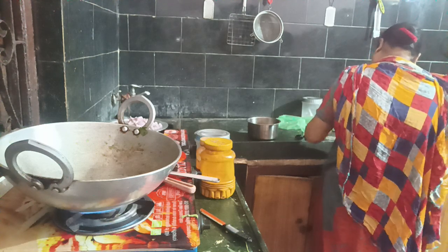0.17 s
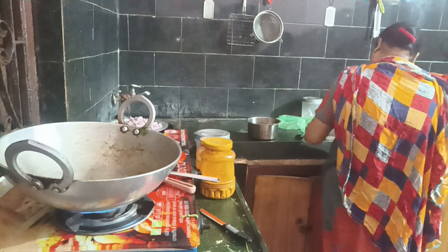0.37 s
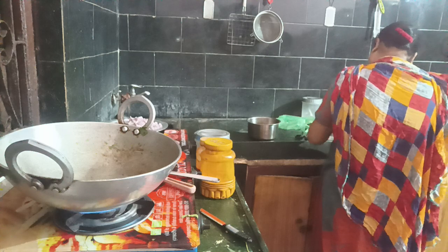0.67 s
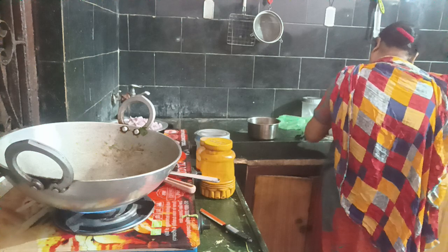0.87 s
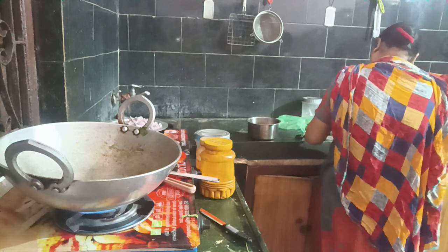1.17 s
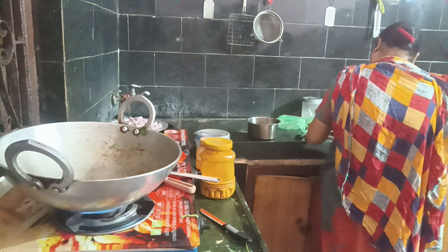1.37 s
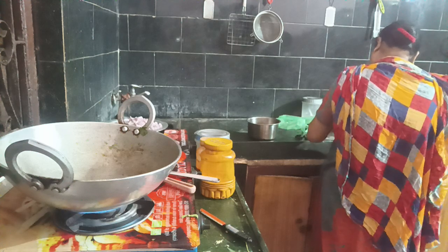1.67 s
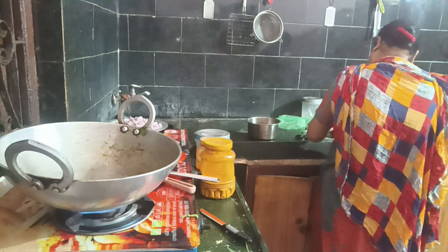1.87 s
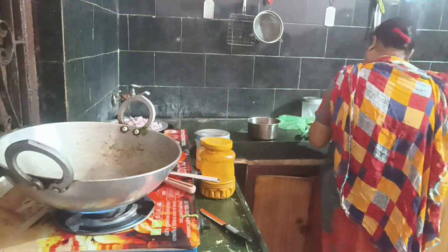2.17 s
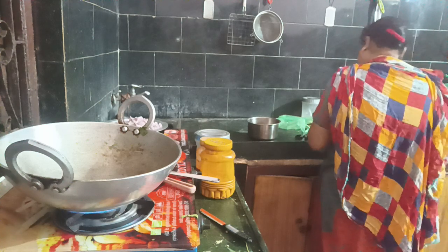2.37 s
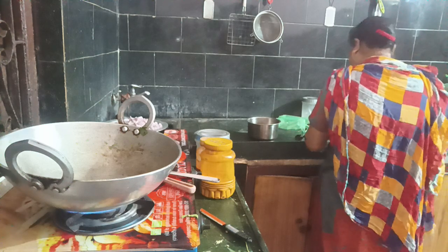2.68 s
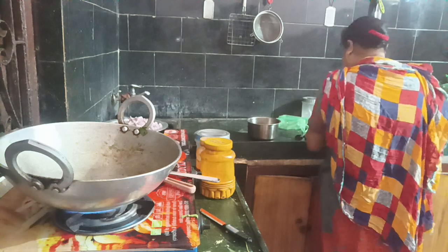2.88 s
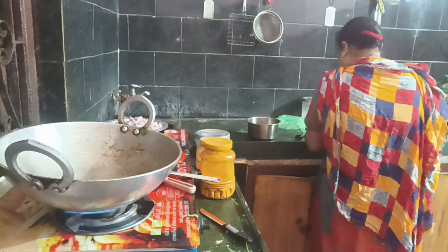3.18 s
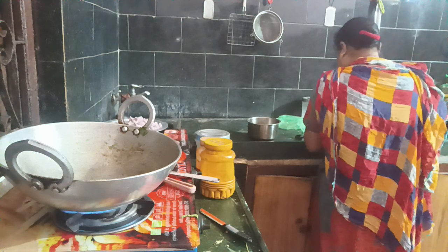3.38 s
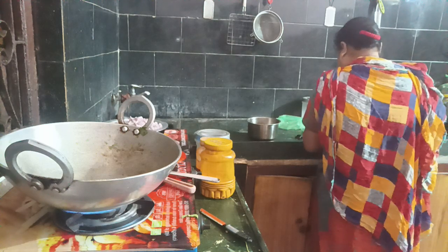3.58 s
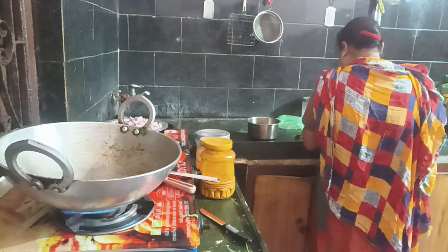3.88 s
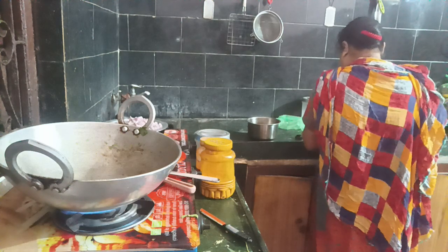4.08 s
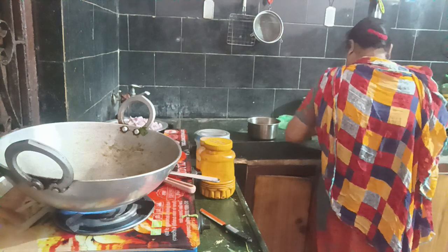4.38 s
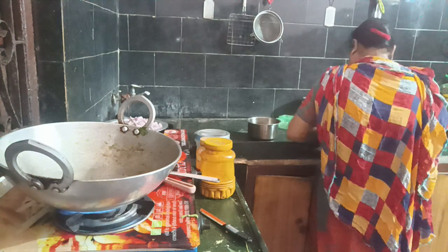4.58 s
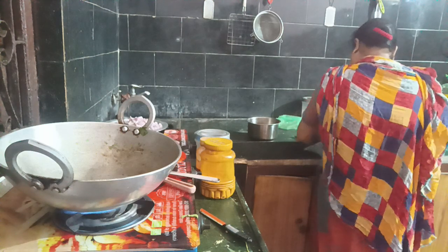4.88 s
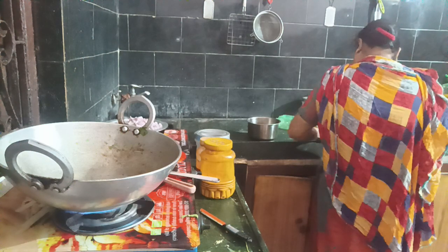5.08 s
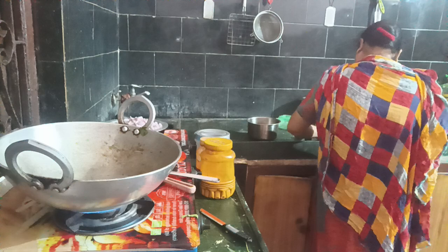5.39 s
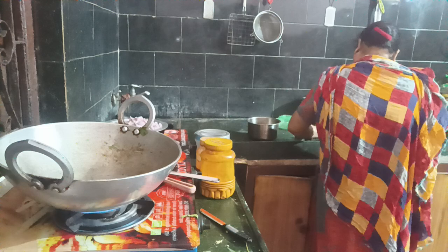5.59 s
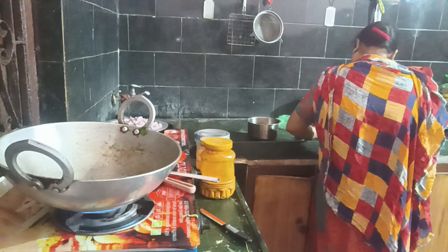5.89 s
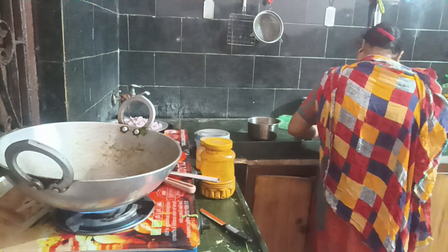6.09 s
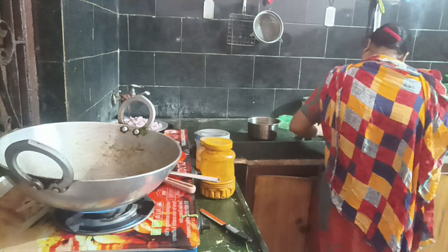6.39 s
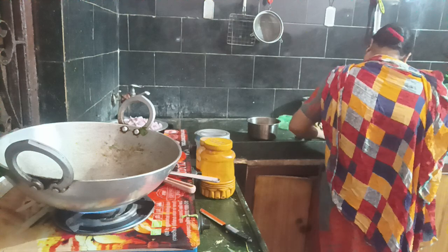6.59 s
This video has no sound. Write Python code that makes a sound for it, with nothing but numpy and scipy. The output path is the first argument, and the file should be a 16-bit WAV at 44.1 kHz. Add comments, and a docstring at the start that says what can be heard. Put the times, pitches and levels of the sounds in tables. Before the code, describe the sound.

Close, bright crackling of hot fat runs throughout, small pops ringing briefly off tiles over a quiet fizz. Behind it, across the room, eight regular dull chopping knocks fall at the beginning and then stop. A faint low thud-like rumble trails them. Around four and a half seconds several weak knocks occur, and near the end a soft hollow tap. Phone microphone, tails clipped by noise reduction.

```python
"""A knife knocks on a board across a small tiled kitchen: filtered clicks feed decaying noise and standing
waves, in a run of even blows and a few soft late ones. Near the microphone a pan sizzles: fat bubbles pop
as short decaying sines that the tiles ring on, over a crowd of small pops and a fizz of shaped noise.
Something low rumbles now and then as beating partials; a noise suppressor in the phone clips the tails
short, band by band, and soft noise fills in."""
import sys
import numpy as np
from scipy import signal
from scipy.fft import rfft, irfft
from scipy.io import wavfile
from scipy.ndimage import uniform_filter1d

SR = 44100
rng = np.random.default_rng(int(sys.argv[2]) if len(sys.argv) > 2 else 0)


def put_to_file(sound):
    """Save the sound as 16-bit audio at rate SR, in the file named by the first command-line argument."""
    columns = np.atleast_2d(sound).T  # one column per channel
    safe = np.clip(columns, -1, 1)
    whole_steps = np.round(safe * 32767)
    wavfile.write(sys.argv[1], SR, whole_steps.astype(np.int16))


N = 296793
LEAD = SR // 4  # samples computed before the start

# spectrum of the frying fat: frequency_hz, density_db (relative, per Hz)
SIZZLE = [(24, -58.5), (40, -40.5), (121, -28), (276, -19.5), (1180, -7.5), (2000, -13.5), (3060, -8),
          (4130, -8), (4700, -7), (5310, 1.5), (5900, -4), (7000, -4.5), (8550, -13), (10400, -20),
          (11300, -93.5), (12100, -29), (16000, -56)]
# noise suppressor: frequency_hz, threshold_db (per band), depth_db (a negative depth lifts)
SUPPRESSOR = [(40, -78, 12.5), (120.9, -74.5, 15.5), (250, -71.5, 19.5), (414, -63.5, 19),
              (980, -66.5, 14.5), (1963, -65.5, 8), (3224, -64.5, 18.5), (4240, -66.5, 10),
              (6270, -65.5, 6), (12000, -67, -2)]


def amp(db):
    """Level law: 20 dB are a factor of ten in amplitude."""
    return 10 ** (np.asarray(db) / 20)


def evened(x):
    """Normalisation to unit rms, the root of the mean power."""
    return x / np.sqrt(np.mean(x ** 2) + 1e-20)


def read(points, hz, column=1):
    """Interpolation of a table column over logarithmic frequency, as pitch is heard."""
    table = np.transpose(points)
    return np.interp(np.log(hz + 1), np.log(table[0] + 1), table[column])


def add(mix, start_s, sound):
    """Superposition: sound pressures add from the given moment on."""
    part = mix[..., LEAD + round(start_s * SR):][..., :sound.shape[-1]]
    part += sound[..., :part.shape[-1]]


def pair_noise(frames, hz):
    """Partial coherence: two random short-time spectra, alike in the bass."""
    # left-right likeness of a diffuse field: frequency_hz, coherence (0 to 1)
    likeness = [(100, 0.69), (300, 0.93), (700, 0.058), (1500, 0.029), (6000, 0.036)]
    a, b, c, d = rng.standard_normal((frames, len(hz), 4)).T
    same = np.clip(read(likeness, hz), -1, 1)[:, None]
    left = a + 1j * b
    right = same * left + np.sqrt(1 - same ** 2) * (c + 1j * d)
    return np.array([left, right])


def wash(shape_db, patchy_db):
    """Spectral shaping: stereo noise of rms 1 with a given colour and drifting patches."""
    frames, hz = (N + LEAD) // 256 + 5, np.fft.rfftfreq(1024, 1 / SR)
    patches = uniform_filter1d(rng.standard_normal((frames, len(hz))), size=12, axis=0)
    patches = evened(uniform_filter1d(patches, size=14, axis=1)).T
    z = pair_noise(frames, hz) * amp(shape_db(hz)[:, None] + patchy_db * patches)
    noise = signal.istft(z, nperseg=1024, noverlap=768)[1]
    return evened(noise[:, :N + LEAD])


def causal(db):
    """Minimum phase: the Hilbert transform of the log gain on an rfft grid gives the phase."""
    log_gain = np.log(amp(np.concatenate([db, db[-2:0:-1]])))
    phase = -signal.hilbert(log_gain).imag
    return np.fft.ifft(np.exp(log_gain + 1j * phase)).real[:len(db)]


def room(build_s):
    """Reverberation: dense reflections build up, then die exponentially band by band; left energy 1."""
    # reverberation time of the tiles: frequency_hz, t60_s
    tiles = [(100, 0.44), (300, 0.61), (500, 0.52), (1500, 0.68), (4000, 0.66), (9000, 0.23), (13000, 0.15)]
    hz, t = np.fft.rfftfreq(512, 1 / SR), np.arange(260) * 128 / SR
    z = pair_noise(len(t), hz) * amp(-60 * t / read(tiles, hz)[:, None])
    tail = signal.istft(z, nperseg=512, noverlap=384)[1]
    tail = tail * (1 - np.exp(-np.arange(tail.shape[1]) / SR / build_s))
    return tail / np.linalg.norm(tail[0])


def rumble():
    """Beating: close low partials interfere while they swell, hold and fade; damped sines tap hollowly."""
    # low rumbles: start_s, level_db, centre_hz, half_width_hz, hold_s, fade_db_per_s
    rumbles = [(1.68, -58, 58, 22, .06, 150), (1.685, -51, 110, 55, 0.04, 140),
               (1.78, -49, 125, 40, 0.17, 220), (1.85, -56, 58, 20, .04, 130),
               (2.05, -66, 122, 12, .18, 45), (2.14, -68, 55, 20, 0.07, 150),
               (6.3, -58.5, 128, 30, .22, 60), (6.32, -67, 185, 35, 0.28, 24)]
    # partials of a faint hollow tap: start_s, level_db, pitch_hz, t60_s
    taps = [(6.262, -41, 510, .2), (6.265, -45, 400, .16), (6.285, -44, 255, .15)]
    rise_s = .03
    out, t = np.zeros(N + LEAD), np.arange(SR) / SR
    for start_s, db, hz, width_hz, hold_s, fade in rumbles:
        spread = rng.uniform(-1, 1, (24, 1))
        # random pitch and phase make the partials beat
        turns = (hz + spread * width_hz) * t + rng.random((24, 1))
        hum = (np.exp(-2.5 * spread ** 2) * np.exp(2j * np.pi * turns)).sum(0)
        hum = hum.imag / abs(hum) ** .15  # slightly evens the beats
        fading_db = db - fade * np.maximum(t - rise_s - hold_s, 0)
        swell = np.minimum(t / rise_s, 1) ** 2 * amp(fading_db)
        add(out, start_s, evened(hum) * swell)
    for start_s, db, hz, t60 in taps:
        envelope = amp(db - 60 * t / t60) * (1 - np.exp(-t / .02))
        add(out, start_s, envelope * np.sin(2 * np.pi * hz * t))
    return out


def heat():
    """Amplitude modulation: one level curve drives both the crowd of pops and the fizz."""
    # course of the sizzle: time_s, level_db (relative)
    course = [(0.0, -49.5), (0.41, -54), (0.8, -48.5), (1.16, -51), (1.54, -52), (1.93, -50), (2.19, -56.5),
              (2.32, -49), (2.62, -51.5), (2.87, -51.5), (3.13, -52.5), (3.54, -53), (4.03, -54),
              (4.61, -55.5), (4.74, -50.5), (4.83, -49), (4.97, -57), (5.19, -55), (5.38, -53),
              (5.7, -56.5), (6.02, -54.5), (6.73, -54)]
    s, db = np.transpose(course)
    return amp(np.interp((np.arange(N + LEAD) - LEAD) / SR, s, db))


def hiss():
    """Shot noise: fine fizz follows the heat, and decaying random bursts make its treble flare."""
    flares_per_s, flare_s, flare_db = 7, .07, 7

    def colour_db(hz):
        # raised by the suppressor's depth, which offsets its loss when shut
        bass_cut_db = 10 * np.log10(1 + (1500 / (hz + 1)) ** 8)
        return read(SIZZLE, hz) + read(SUPPRESSOR, hz, column=2) - bass_cut_db

    fizz = wash(colour_db, patchy_db=2.2)
    treble = signal.sosfilt(signal.butter(4, 6500, "high", fs=SR, output="sos"), fizz)
    starts = (rng.random(N + LEAD) < flares_per_s / SR) * rng.exponential(1, N + LEAD)
    bursts = signal.lfilter([1], [1, -np.exp(-1 / flare_s / SR)], starts)
    # between flares the treble gain is -4.5 dB
    treble_gain = amp(flare_db * np.minimum(bursts, 1.5) - 4.5)
    return (fizz + treble * (treble_gain - 1)) * heat() * amp(5.5)


def bubble(hz, cycles):
    """Cavity resonance: the skin snaps with a tick as the cavity rings some cycles, sinking a little."""
    tick_db, tick_hz = -14.5, 6460
    u = np.arange(int(3 * cycles / hz * SR)) / SR * hz / cycles  # time in units of the ringing span
    envelope = (2.016 * u * np.exp(1 - 2.617 * u)) ** 2
    ring = np.sin(2 * np.pi * cycles * u * (1 - 0.0086 * u)) * envelope
    snap = np.arange(24) / SR
    tick = amp(tick_db) * np.sin(2 * np.pi * tick_hz * snap) * np.hanning(len(snap))
    return np.pad(ring, (0, len(tick))) + np.pad(tick, (0, len(ring)))


def spits():
    """Poisson process: at most 100 middling pops with exponential gaps, random pitches and strengths."""
    rate_per_s, lowest_db, low_hz, high_hz = 16, -51, 4800, 6000
    when, pitch, size = rng.random((100, 3)).T
    s = np.cumsum(-np.log(1 - when)) / rate_per_s
    rows = np.transpose([s, lowest_db + 7.0 * size, low_hz * (high_hz / low_hz) ** pitch])
    return list(rows[s < N / SR])


def pan():
    """Direct and reverberant field: single pops and a crowd of small ones, then the tiles' answer."""
    # single bubbles bursting in the fat, loud ones and faint high ones:
    # start_s, level_db (relative), pitch_hz
    pops = [(0.0598, -61, 12100), (0.1392, -39.5, 3900), (0.2413, -36.5, 5600), (0.334, -38, 5500),
            (0.4263, -33.5, 5000), (0.449, -42, 4870), (0.532, -45, 4900), (0.6974, -36, 3410),
            (0.714, -35, 5560), (0.881, -42.5, 9000), (1.145, -39.5, 3220), (1.1926, -32, 5800),
            (1.2488, -31, 5370), (1.2845, -67, 11500), (1.3228, -36, 5550), (1.3344, -34, 3140),
            (1.504, -50, 14200), (1.5644, -35.5, 5130), (1.584, -34, 3280), (1.753, -36.5, 3230),
            (1.752, -32, 5100), (1.78, -47, 5400), (1.9565, -58, 11700), (2.02, -37, 5670),
            (2.196, -37, 5560), (2.197, -35, 3220), (2.249, -55, 10300), (2.3058, -28, 3080),
            (2.314, -58.5, 11000), (2.412, -25.5, 2430), (2.4174, -30.5, 1980), (2.42, -38.5, 9400),
            (2.53, -58, 12960), (2.5637, -40, 3080), (2.611, -33.5, 5640), (2.6313, -33, 5200),
            (2.685, -65.5, 13000), (2.718, -38.5, 2086), (2.7579, -35.5, 3850), (2.814, -62, 12900),
            (2.857, -42, 5270), (2.9053, -41.5, 2390), (2.9077, -32, 5010), (2.9532, -34.5, 3330),
            (3.0523, -36, 5230), (3.1974, -39, 2950), (3.277, -41.5, 1990), (3.277, -60.5, 11400),
            (3.2886, -36, 5200), (3.351, -37, 5500), (3.461, -50, 9990), (3.5559, -33, 2105),
            (3.5644, -36.5, 4570), (3.65, -36, 4790), (3.7347, -27, 3140), (3.8054, -33, 4500),
            (3.877, -34.5, 1800), (3.926, -36.5, 3260), (4.1824, -38, 5000), (4.286, -41, 3620),
            (4.2881, -34, 5600), (4.3259, -38, 3800), (4.5556, -35.5, 5190), (4.5999, -66, 12600),
            (4.6177, -37, 5100), (4.6527, -36.5, 5600), (4.726, -49.5, 3800), (4.8075, -31, 4970),
            (4.811, -31, 2800), (4.8573, -34, 3550), (4.882, -35, 5700), (4.8823, -62, 11900),
            (4.953, -35, 5780), (5.2009, -38, 5750), (5.2739, -40.5, 3790), (5.281, -57, 12320),
            (5.3996, -37.5, 3600), (5.5695, -35, 5420), (5.765, -37.5, 2940), (5.8658, -39, 5260),
            (5.8894, -58.5, 12740), (5.9821, -35, 5060), (6.1404, -39.5, 5370), (6.347, -38.5, 3190),
            (6.346, -40.5, 5370), (6.376, -36, 3590), (6.4154, -38, 2230), (6.446, -41, 6000),
            (6.5688, -28.5, 3190), (6.7134, -47, 5370)]
    # time span of a bubble's ringing: pitch_hz, span_cycles
    ringing = [(2000, 3.2), (3200, 5.3), (5300, 3.76), (9000, 3.5), (12500, 9.8)]
    # direct level of a pop: pitch_hz, gain_db
    near = [(2000, 12), (3200, 12.5), (5300, 9), (9000, 2), (12500, -7)]
    # share of a pop that reaches the walls: pitch_hz, gain_db
    walls = [(3000, 3), (6000, 7.5), (10000, 7.5), (12500, 10)]
    # first reflections off wall and ceiling: delay_ms, level_db
    echoes = [(2.4, -7), (8.5, -11), (18.5, -11), (22.8, -5), (27.5, -10)]
    side_db, scatter_db = -4, 2.5  # left minus right: the pan sits a little right, pops scatter over it
    left_lag = 9  # samples by which the left port hears the pan later
    splash_db, splash_s = 6, 0.014  # the near corner throws a pop back strongly at first

    dry, spread = np.zeros((2, N + LEAD)), np.zeros(N + LEAD)
    for (start_s, db, hz), spot in zip(pops + spits(), rng.standard_normal(300)):
        pop = bubble(hz, max(read(ringing, hz), 1))
        balance_db = np.array([[.5], [-.5]]) * (side_db + scatter_db * spot)
        add(dry, start_s, amp(db + read(near, hz) + balance_db) * pop)
        add(spread, start_s, amp(db + read(walls, hz)) * pop)

    crowd = np.zeros(N + LEAD)
    for hz in np.geomspace(1800, 9000, num=20):
        size = amp(3.0 * np.minimum(rng.exponential(1, len(crowd)), 3))
        bursts = size * (rng.random(len(crowd)) < 20 / SR)  # about 20 a second at each pitch
        crowd += amp(read(SIZZLE, hz)) * signal.oaconvolve(bursts, bubble(hz, 5.2))[:len(crowd)]
    crowd = evened(crowd) * heat() * amp(-8.5)
    dry, spread = dry + crowd, spread + crowd
    dry[0] = np.roll(dry[0], left_lag)

    tail = room(build_s=0.0039)
    tail = tail * amp(splash_db * np.exp(-np.arange(tail.shape[1]) / SR / splash_s))
    wet = signal.fftconvolve(spread[None], tail, axes=1)[:, :N + LEAD]
    # each early reflection arrives with the sides exchanged
    early = sum(amp(db) * np.roll(dry[::-1], round(ms * SR / 1000), axis=1) for ms, db in echoes)
    return dry + early + amp(6.0) * wet


def knife():
    """Impulse response: each blow is a click coloured by the board, heard from far through the room."""
    # blows: start_s, energy_db (before the rise), hardness_db_per_octave, treble_edge_hz, body_db,
    # bass_edge_hz
    blows = [(-.06, 7, -4, 2360, 2.5, 75), (.199, 10.5, 4, 2470, 1, 75), (0.468, 7, -0.5, 1570, 3, 74.6),
             (0.73, 11, 3, 2800, -0.5, 75), (0.988, 9, 3, 2210, 0.5, 75), (1.216, 7.5, 1.8, 2380, 0.5, 75),
             (1.485, 8, 5.5, 3460, 2, 75), (1.788, 14, 10.5, 3330, 0.5, 80), (4.38, 0, 9, 2600, -1.5, 171),
             (4.733, -8.5, 11, 1880, 1.5, 260), (4.771, -12, 2.5, 1000, -11, 230),
             (4.875, -18, 9, 1100, -12.5, 484)]
    # colour of a blow: frequency_hz, density_db (relative, per Hz)
    board = [(30, -37), (70, -24.5), (120, -6.5), (230, -2), (320, 3), (420, 2), (600, -0.5), (900, -5.5),
             (1400, -15.5), (2000, -17.5), (2800, -26), (4000, -31), (7000, -20), (14000, -70.5)]
    # standing waves of counter and kitchen: pitch_hz, level_db (relative), t60_s
    modes = [(123, -9, .6), (169, -1, .55), (203, -6, .45), (306, 1, .55), (345, -1, .35), (401, 3, .7),
             (483, 3, .33), (525, -2, .4), (576, 6, .3), (764, 2, .35), (874, 3, .28), (1104, 2, .35),
             (1195, 1, .3), (1450, 0, .35)]
    firm_db, rise_ms, slower_ms_per_db = 3.5, 0.76, 1.77  # below firm_db a blow is light and rises slower
    first_share, swell_ms = 0.68, 22  # part of a blow arrives at once, the rest gathers from the walls
    ring_db, ring_scatter_db = -15, 3  # the strength of each ring varies at random from blow to blow
    body_hz = 360  # the body of the board
    left_lag = 7  # samples by which the left port hears the knife later

    hz, out = np.fft.rfftfreq(4096, 1 / SR), np.zeros((2, N + LEAD + SR))
    common = room(build_s=0.0035)
    t = np.arange(common.shape[1]) / SR
    # each standing wave reaches the two ports with its own phase
    phases = rng.normal(0, 0.53, (len(modes), 2, 1))
    rings = np.array([amp(db - 60 * t / t60) * np.sin(2 * np.pi * f * t + phase)
                      for (f, db, t60), phase in zip(modes, phases)])
    rings = rings / np.linalg.norm(rings.sum(0)[0])
    gather = 1 - (1 - first_share) * np.exp(-t * 1000 / swell_ms)

    for start_s, db, hard_db, treble_hz, body_db, bass_hz in blows:
        # softer food under the blade takes off the treble, a light blow does not move the counter
        treble_loss = 1 + (hz / treble_hz) ** 12
        bass_loss = 1 + (bass_hz / (hz + 1)) ** 8
        cushion_db = -10 * np.log10(treble_loss * bass_loss)
        hollow_db = body_db * np.exp(-np.log2((hz + 1) / body_hz) ** 2 / 0.41)
        tilt_db = hard_db * np.log2((hz + 350) / 800)
        click = causal(read(board, hz) + tilt_db + cushion_db + hollow_db)
        click = click[None] / np.linalg.norm(click)

        # part of the room's tail is shared by all blows, rather more is new each time
        paths = .65 * common + .76 * room(build_s=.002)
        ring_gains = amp(ring_db + ring_scatter_db * rng.standard_normal(len(modes)))
        rung = np.tensordot(ring_gains, rings, axes=1)
        light_db = max(firm_db - db, 0)
        rise = 1 - np.exp(-t * 1000 / (rise_ms + slower_ms_per_db * light_db))
        space = (paths + rung) * gather * rise
        add(out, start_s, amp(db) * signal.fftconvolve(click, space, axes=1))
    return np.array([np.roll(out[0], left_lag), out[1]])[:, :N + LEAD]


def scene():
    """Superposition of knife, pan, hiss and rumble, without the lead-in."""
    return (knife() + pan() + hiss() + rumble())[:, LEAD:]


def ports(x):
    """Frequency response: the two microphone ports differ a little in colour."""
    # left port minus right: frequency_hz, difference_db
    contrast = [(60, 1), (160, -4.5), (270, 1.5), (450, 1), (740, 0), (2000, -1.5), (5500, -3), (9000, 1.5),
                (15000, -7)]
    half_db = .5 * read(contrast, np.fft.rfftfreq(x.shape[1], 1 / SR))
    return irfft(rfft(x) * amp([half_db, -half_db]), x.shape[1])


def record(dry):
    """Spectral gating: bands under threshold change by their depth, soft noise fills in, a low-pass ends."""
    # soft fill-in noise: frequency_hz, density_db (relative, per Hz)
    air = [(18, -44), (30, -15.5), (49, -12), (118, -9.5), (280, -11.5), (841, -10.5), (1170, -17.5),
           (1820, -3.5), (3000, -4.5), (3900, -41.5), (6600, -120)]
    air_db, edge_hz = -62.5, 15750
    # a loud moment raises the threshold by a share of the excess, which is then forgotten
    wary, forget_db_per_s = 0.18, 28

    hz, t, z = signal.stft(ports(dry), SR, nperseg=1024, noverlap=768)
    power = uniform_filter1d((abs(z) ** 2).mean(0), size=4, axis=0)
    power = uniform_filter1d(power, size=3, axis=1, origin=1)
    over_db = 10 * np.log10(abs(power) + 1e-20) - read(SUPPRESSOR, hz)[:, None]
    forgotten_db = forget_db_per_s * t
    recent_db = np.maximum.accumulate(over_db + forgotten_db, axis=1) - forgotten_db
    over_db = over_db - wary * np.maximum(recent_db, 0)
    # once open, a band is held for a moment before it shuts
    fall_db = 90 * t
    over_db = np.maximum.accumulate(np.minimum(over_db, 8) + fall_db, axis=1) - fall_db
    shut = .5 - .5 * np.tanh(over_db / 3)
    gain = amp(-read(SUPPRESSOR, hz, column=2)[:, None] * shut)
    kept = signal.istft(z * gain, SR, nperseg=1024, noverlap=768)[1][:, :N]

    def air_colour_db(hz):
        return read(air, hz) - 10 * np.log10(1 + (95 / (hz + 1)) ** 6)

    kept = kept + amp(air_db) * wash(air_colour_db, patchy_db=1.0)[:, :N]
    low_pass = signal.firwin(511, edge_hz, window=("kaiser", 9), fs=SR)
    return signal.oaconvolve(kept, low_pass[None], "same")


dry = scene()
out = record(dry)
put_to_file(out)
```